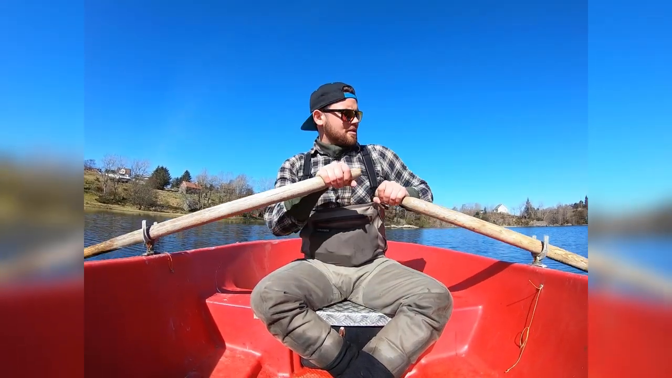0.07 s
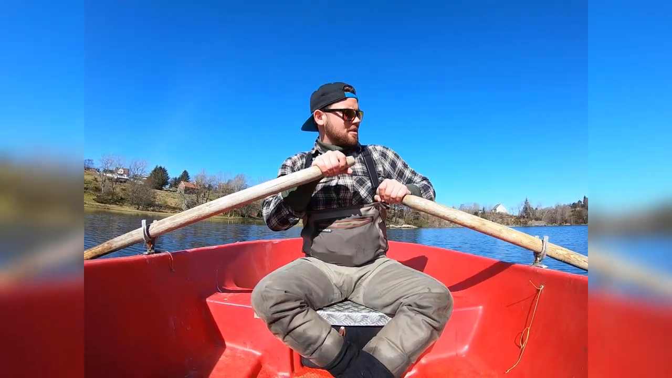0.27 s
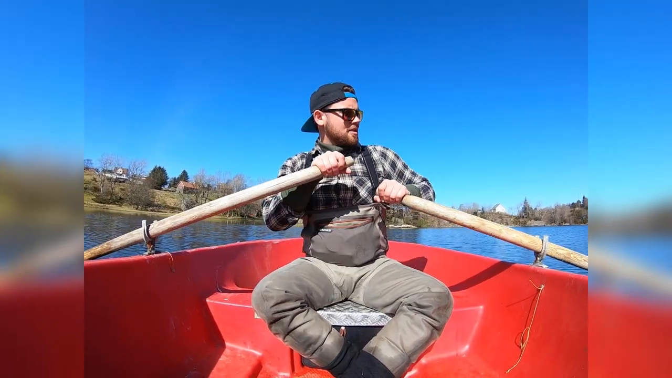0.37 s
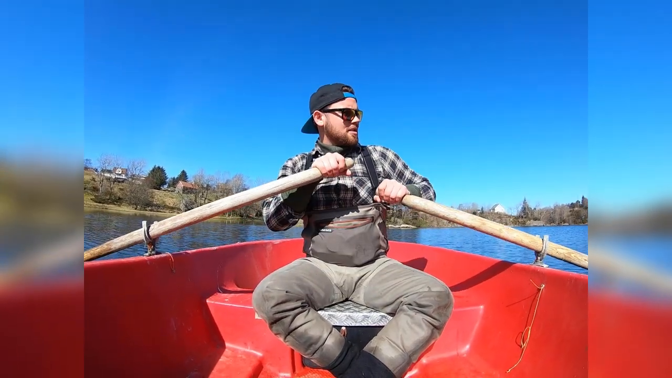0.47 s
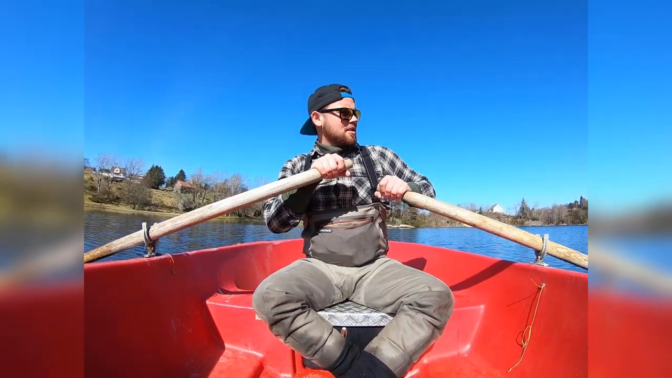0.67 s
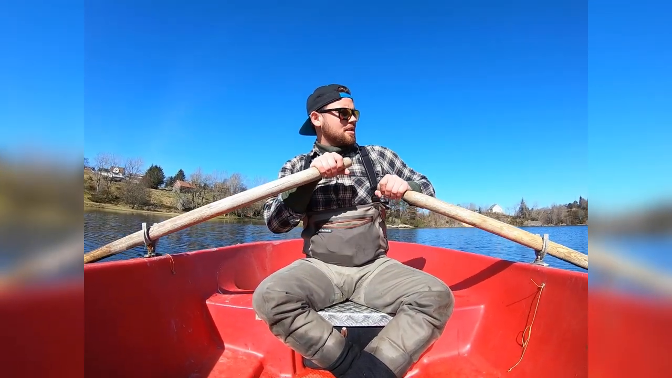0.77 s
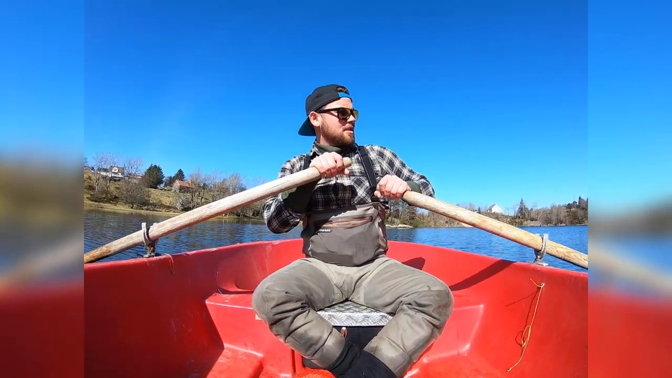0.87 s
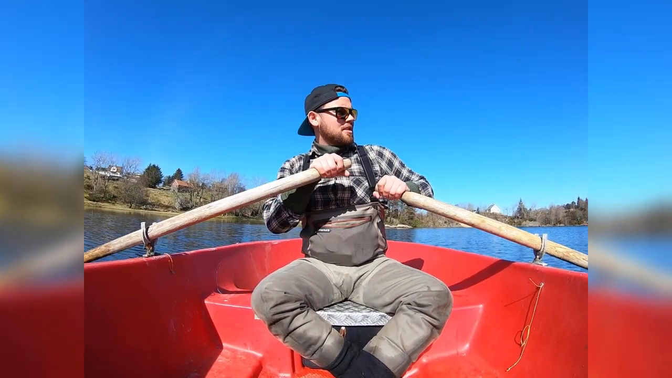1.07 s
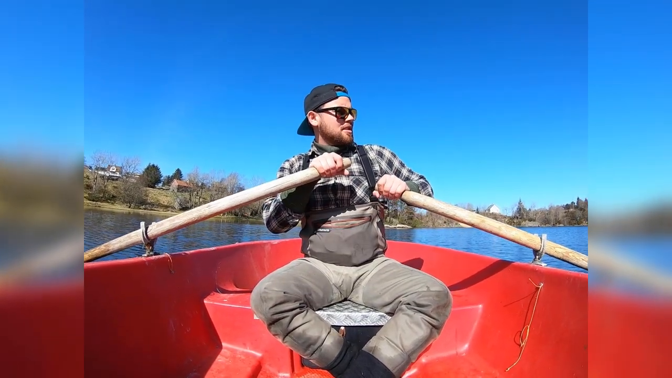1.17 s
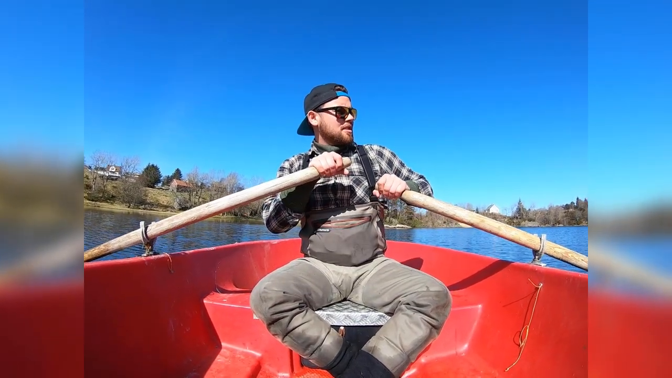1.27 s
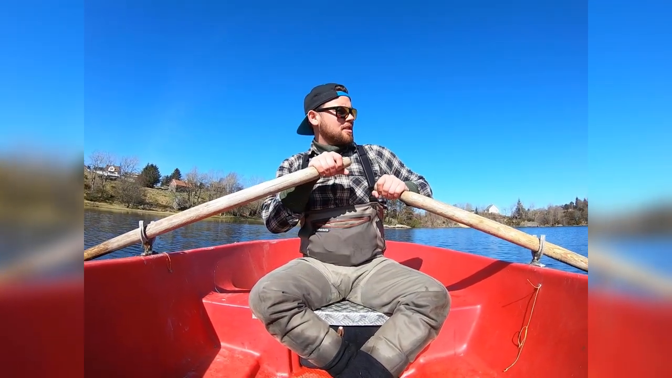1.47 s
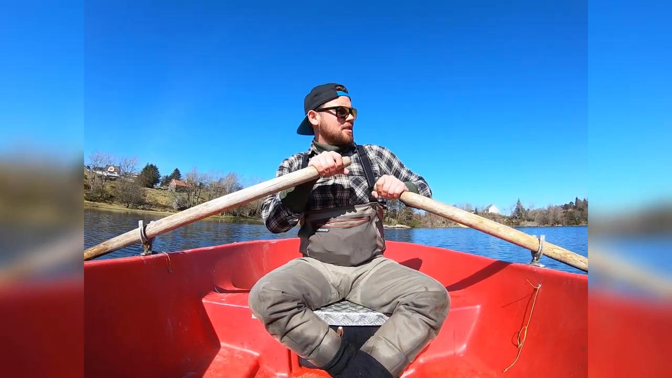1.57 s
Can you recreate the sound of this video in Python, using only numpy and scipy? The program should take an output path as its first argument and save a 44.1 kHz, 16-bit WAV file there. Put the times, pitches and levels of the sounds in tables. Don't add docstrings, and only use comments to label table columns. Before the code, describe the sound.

Rowing splash heard on board a small plastic boat on open water. Light spray and faint knocks open it; at 0.2-0.4 seconds low, hollow oarlock thuds cluster with the strongest churning splash and bright bubbling plops. Another surge follows near 0.5, a clear plop at 0.73, then ticking droplets, and softer swirls, gurgles and drips thin out until about 1.6 seconds. Light breeze rumbles low, uneven between left and right.

```python
import sys
import numpy as np
from scipy import signal
from scipy.fft import rfft, irfft, next_fast_len
from scipy.io import wavfile
from scipy.ndimage import map_coordinates

SR = 44100
rng = np.random.default_rng(int(sys.argv[2]) if len(sys.argv) > 2 else 0)


def field_ratio(decibels):
    return 10 ** (np.asarray(decibels, dtype=float) / 20)


def master_out(mix):
    frames = np.transpose(np.atleast_2d(mix))
    ceiling = np.clip(frames, -1, 1)
    pcm = np.round(ceiling * 32767).astype(np.int16)
    wavfile.write(sys.argv[1], SR, pcm)


N = 72765
TIME_S = np.arange(N) / SR


def unit(x):
    return x / np.sqrt(np.mean(x ** 2) + 1e-20)


def along(points, hz):
    f, v = np.transpose(points)
    return np.interp(np.log(hz + 1), np.log(f + 1), v)


def wobble(knots_per_s):
    return map_coordinates(rng.standard_normal(2000), [np.arange(N) * min(knots_per_s, 1000) / SR])


def filtered(x, response):
    m = next_fast_len(N + 8192)
    return irfft(rfft(x, m) * response(np.fft.rfftfreq(m, 1 / SR)), m)[..., :N]


def coloured(x, spectrum):
    return unit(filtered(x, lambda hz: field_ratio(along(spectrum, hz)) * (hz > spectrum[0][0] / 2)))


def bubbles(s, db, hz, cycles, rise, pan_db, size):
    spread_s_per_db = 0.00002
    cycles, rise = np.reshape(cycles, (-1, 1)), np.reshape(rise, (-1, 1))
    life = np.arange(size) / SR * hz[:, None] / cycles
    onset = 1 - np.exp(-(life * cycles / 1.355) ** 2)
    tone = np.sin(2 * np.pi * cycles * life * (1 + rise * life / 2))
    wave = field_ratio(db[:, None] - 26.0 * life) * onset * tone
    ports = []
    for side in (1, -1):
        start_s = np.clip(s - side * pan_db * spread_s_per_db / 2, 0, N / SR)
        at = np.round(start_s * SR).astype(int)[:, None] + np.arange(size)
        panned = wave * field_ratio(side * pan_db / 2)[:, None]
        ports.append(np.bincount(at.ravel(), panned.ravel(), N + size + 1)[:N])
    return np.array(ports)


def swarm(count, centre_hz, octaves, cycles, spread_db, pan_db, size):
    r, g = rng.random((count, 2)), rng.standard_normal((count, 2))
    hz = np.clip(centre_hz * 2 ** (octaves * g[:, 0]), 250, 14000)
    db = np.minimum(-spread_db * np.log(r[:, 1]), 2.6 * spread_db)
    db = db - 5 * octaves * np.abs(g[:, 0])
    return unit(bubbles(r[:, 0] * N / SR, db, hz, cycles, 0.15 * g[:, 1], pan_db + 9 * g[::-1, 1], size))


# frequency in Hz, density in dB per Hz.
RUMBLE_SPECTRUM = [(15, 15.5), (35, 7.5), (70, 11), (110, -3.5), (200, -12.5), (400, -86), (1500, -120)]
# centre in seconds, level in dB, half width in seconds.
BREEZE_PUFFS = [(.07, -53, 0.034), (0.138, -44, 0.059), (0.229, -34.5, 0.028), (0.357, -46, 0.04),
                (0.429, -49, 0.029), (.50, -69, 0.036), (0.69, -44, 0.026), (.78, -45.5, 0.019),
                (0.847, -43, 0.03), (0.937, -45, 0.027), (0.986, -48.5, 0.021), (1.128, -52.5, 0.038),
                (1.181, -43.5, 0.023), (1.221, -50, 0.019), (1.32, -54, 0.0085), (1.37, -70, 0.018),
                (1.509, -53, 0.028), (1.611, -75, 0.023)]


def breeze():
    lull_db = -63
    s, db, half_width_s = np.transpose(BREEZE_PUFFS)[:, :, None]
    gain = field_ratio(lull_db) + (field_ratio(db) * np.exp(-((TIME_S - s) / half_width_s) ** 2)).sum(0)
    common, *own = coloured(rng.standard_normal((3, N)), RUMBLE_SPECTRUM)
    return gain * (0.56 * common + 1.47 * np.array(own))


# start in seconds, churn level in dB, spray level in dB,
# hold in seconds, release in dB per second.
BLADE_SURGES = [(0.0, -87, -64, 0.011, 30), (0.023, -72, -54, 0.053, 504), (0.177, -49, -47, 0.038, 195),
                (0.236, -43, -52, 0.039, 188), (0.276, -54, -50, 0.016, 143),
                (0.322, -47.5, -52, 0.082, 109), (0.381, -73, -52, 0.091, 252),
                (0.455, -59, -52, 0.036, 196), (0.487, -48.5, -61.5, 0.097, 243),
                (0.636, -48.5, -57.5, 0.036, 139), (0.684, -48, -62.5, 0.18, 76),
                (0.97, -50.5, -65, 0.032, 161), (1.055, -52, -64.5, 0.043, 95),
                (1.16, -55, -63, 0.046, 112), (1.27, -54.5, -66.5, 0.088, 89), (1.398, -58, -68, 0.13, 190),
                (1.566, -57.5, -65.5, 0.049, 112)]


def surges():
    attack_s, churn_calm_db, spray_calm_db = 0.0064, -67, -83
    s, churn_db, spray_db, hold_s, release_db_per_s = np.transpose(BLADE_SURGES)[:, :, None]
    t = TIME_S - s
    rise = np.clip(1 + t / attack_s, 0, 1) ** 2
    power = rise * field_ratio(-release_db_per_s * np.clip(t - hold_s, 0, None)) ** 2

    def total_db(db, calm_db):
        return 10 * np.log10((power * field_ratio(db) ** 2).sum(0) + field_ratio(calm_db) ** 2)

    return total_db(churn_db, churn_calm_db), total_db(spray_db, spray_calm_db)


# frequency in Hz, density in dB per Hz.
CHURN_SPECTRUM = [(200, 6.5), (300, -16), (600, 5), (1500, -5), (2500, -3), (4000, -41), (7000, -48),
                  (11000, -86)]
# frequency in Hz, left-right correlation (0 to 1).
PORT_LIKENESS = [(250, 0.09), (640, 0.49), (1400, 0.04), (4000, 0.14)]


def churn():
    level_db, _ = surges()

    def mid_side(hz):
        angle = np.arccos(np.clip(along(PORT_LIKENESS, hz), -1, 1)) / 2
        return [np.cos(angle), np.sin(angle)]

    mid, side = filtered(rng.standard_normal((2, N)), mid_side)
    bed = coloured(np.array([mid + side, mid - side]), CHURN_SPECTRUM)
    bed = bed * field_ratio(2.3 * np.array([wobble(29.14), wobble(30.7)])) * field_ratio([[-1.2], [1.2]])
    foam = swarm(count=1500, centre_hz=1650, octaves=0.55, cycles=11, spread_db=2.5, pan_db=-3.5, size=900)
    gulps = swarm(count=600, centre_hz=500, octaves=0.67, cycles=5.3, spread_db=1.0, pan_db=1.0, size=2400)
    fizz = swarm(count=500, centre_hz=3400, octaves=0.31, cycles=20, spread_db=3, pan_db=-2.5, size=400)
    mix = field_ratio(-4) * bed + field_ratio(-0.53) * foam + field_ratio(-8.0) * gulps + field_ratio(-21) * fizz
    return field_ratio(level_db + 1.3 * wobble(25.15)) * mix


# frequency in Hz, density in dB per Hz.
SPRAY_SPECTRUM = [(2500, -3), (3500, 0.5), (5500, -7), (8000, -7), (11400, -27.5), (13500, -33),
                  (15300, -56), (16000, -100)]
# start in seconds, peak in dB, pitch in Hz.
DROPLET_TICKS = [(0.067, -45, 5640), (0.16, -49, 6800), (0.186, -49, 5940), (0.2033, -42, 5030),
                 (0.362, -37, 6200), (0.428, -35, 7700), (0.5586, -60, 5900), (0.5921, -52, 7860),
                 (0.631, -51.5, 7200), (0.656, -56, 9500), (0.6659, -48, 5360), (0.681, -55, 8000),
                 (0.7055, -44, 7800), (0.72, -62, 8100), (0.731, -45.5, 5700), (0.776, -42.5, 7050),
                 (0.7986, -59, 7060), (0.816, -44, 7000), (0.831, -43.5, 6500), (0.8701, -45.5, 7450),
                 (0.9085, -51.5, 6900), (0.9658, -57, 6300), (0.9924, -44, 6760), (1.003, -50, 6400),
                 (1.034, -58.5, 9000), (1.064, -60, 5000), (1.08, -66, 8000), (1.1616, -63, 6100),
                 (1.198, -51, 4800), (1.438, -52.5, 7040), (1.4509, -50.5, 5900), (1.507, -59, 7000)]


def spray():
    port_lag_s, tick_pan_db, tick_top_hz = 0.000075, -6.5, 10400
    _, level_db = surges()
    gain = field_ratio(level_db)

    def lag(hz):
        return np.exp(1j * np.pi * hz * port_lag_s * np.array([[1], [-1]]))

    r = rng.random((2, N))
    sparks_db = np.minimum(-4 * np.log(r[1] + 1e-9), 11)
    crackle = unit((r[0] < 0.005) * rng.standard_normal(N) * field_ratio(sparks_db))
    near = 0.6 * crackle + rng.standard_normal(N) * field_ratio(3.5 * wobble(45))
    near = coloured(near, SPRAY_SPECTRUM) * field_ratio([[-2.6], [2.6]])
    patches = field_ratio(6.1 * np.array([wobble(110), wobble(80)]))
    wide = coloured(rng.standard_normal((2, N)) * patches, SPRAY_SPECTRUM)
    hiss = filtered(gain * near, lag) + gain * field_ratio(-3.5) * wide

    treble_hz, treble_full_db, treble_db_per_db = 10800, -56, 1.3
    treble = filtered(hiss, lambda hz: 1 / (1 + (treble_hz / (hz + 1)) ** 16))
    treble_gain = field_ratio(treble_db_per_db * np.minimum(level_db - treble_full_db, 0))

    s, db, hz = np.transpose(DROPLET_TICKS)
    ticks = bubbles(s, db + 13.5, hz, cycles=7, rise=0.055, pan_db=tick_pan_db + 0 * s, size=200)
    ticks = filtered(ticks, lambda hz: 1 / (1 + (hz / tick_top_hz) ** 8))
    return hiss - treble * (1 - treble_gain) + filtered(ticks, lag)


# start in seconds, peak in dB, pitch in Hz, left-right difference in dB.
WATER_PLOPS = [(0.0492, -38.5, 2150, -9), (0.0745, -36, 1980, -20), (0.107, -42.5, 2260, -5),
               (0.1707, -34, 1557, -27.5), (0.2353, -37.5, 1660, -15), (0.2528, -32, 1530, 7),
               (0.255, -22, 2440, 3.5), (0.2605, -33.5, 1960, 7), (0.3278, -30, 1830, 8),
               (0.3697, -32, 1700, -5), (0.4081, -28, 1636, -12), (0.4429, -31.5, 1390, -10),
               (0.474, -41, 1640, -12), (0.4962, -35.5, 1274, -19.5), (0.5447, -32.5, 1720, -3),
               (0.5916, -40, 1170, 13), (0.637, -34.5, 1880, 23), (0.6545, -31, 1700, -6.5),
               (0.7245, -35, 842, -6), (0.7281, -23.5, 1257, -10), (0.7706, -36, 1320, -12),
               (0.8309, -49.5, 1010, -15), (0.905, -34, 1850, -9.5), (0.9667, -43, 1690, -13),
               (0.998, -33.5, 1680, -9), (1.014, -39.5, 2000, -16), (1.046, -56, 3270, 1),
               (1.075, -45, 3800, -10), (1.051, -41.5, 1230, -13), (1.073, -42.5, 2650, -10.5),
               (1.1023, -39.5, 2090, 4), (1.1514, -42.5, 1310, -18), (1.152, -41, 2900, -6),
               (1.18, -41, 843, 6), (1.2106, -55, 1370, 18), (1.254, -45, 3020, -2), (1.276, -42, 2800, -3),
               (1.3044, -34.5, 2010, -13.5), (1.328, -39, 1640, -10), (1.3663, -45, 1970, 21),
               (1.4066, -44, 2040, -1), (1.418, -42, 1370, 5), (1.4308, -39.5, 1460, -20.5),
               (1.5632, -40.5, 1475, 11), (1.567, -47, 3470, 4), (1.6091, -44.5, 1530, 9)]
# start in seconds, peak in dB, pitch in Hz,
# life in cycles, pitch rise over life (fraction).
WATER_GURGLES = [(.329, -29.5, 2760, 18, 0.091), (0.338, -29, 1514, 16.4, 0.068), (.54, -47, 604, 40, 0.18),
                 (.635, -45.5, 394, 12.4, -0.21), (.71, -30, 630, 7.8, 0.21), (.74, -44.5, 190, 20, -0.089),
                 (.865, -45, 398.6, 26, 0.34), (.655, -44.5, 245, 15.6, -0.19),
                 (.16, -43.5, 1690, 12, -0.36), (0.186, -33.5, 2190, 19, 0.068),
                 (.995, -42.5, 585, 70.4, -.09), (1.059, -35.5, 513, 6.6, 0.11),
                 (1.125, -49, 634, 12, -0.1), (1.244, -49, 663, 28, 0.023), (1.31, -57, 614, 31, 0.014),
                 (1.337, -49, 680, 23, 0.23), (1.37, -54.5, 577, 38, 0.065), (1.438, -54.5, 456, 20, 0.084),
                 (1.609, -47, 415, 5.8, -0.14), (1.46, -48, 785, 24, -0.036), (1.475, -49.5, 877, 82, 0.54),
                 (1.59, -53, 843, 21, -0.16), (0.328, -29, 75.5, 13, 0.1), (1.535, -70, 3330, 340, 0.44),
                 (1.59, -44, 500, 5.9, -0.067)]


def drips():
    plop_cycles, trail_count, trail_s, trail_octaves, trail_db = 9.5, 5, 0.014, 0.22, -9
    s, db, hz, pan_db = np.transpose(WATER_PLOPS)
    db = db + 3.5
    plops = bubbles(s, db, hz, plop_cycles, 0.083, pan_db, size=1200)

    r, g = rng.random((len(s), trail_count)), rng.standard_normal((len(s), trail_count))
    late_s = (s[:, None] + trail_s * r).ravel()
    late_db = (db[:, None] + trail_db - 6 * r).ravel()
    late_hz = (hz[:, None] * 2 ** (trail_octaves * g)).ravel()
    late_pan_db = np.repeat(pan_db / 2, trail_count)
    trail = bubbles(late_s, late_db, late_hz, plop_cycles, 0.3, late_pan_db, size=1200)

    s, db, hz, cycles, rise = np.transpose(WATER_GURGLES)
    flutter = field_ratio(3 * np.array([wobble(70), wobble(68.6)]))
    gurgles = bubbles(s, db + 2.0, hz, cycles, rise, pan_db=-4 + 0 * s, size=6000)
    return plops + trail + flutter * gurgles


# time in seconds, rub level in dB.
OAR_LOAD = [
    (0.0, -40),
    (0.196, -47.5),
    (1.65, -70),
]
# time in seconds, level in dB.
OARLOCK_KNOCKS = [(0.051, -36), (0.085, -34.5), (.199, -19.5), (0.213, -33.5), (0.2272, -19.5),
                  (0.2376, -13.5), (0.2475, -16), (0.284, -21.5), (0.292, -30), (0.333, -31.5),
                  (0.361, -27.5), (0.401, -31.5), (0.656, -46), (.715, -39.5), (0.74, -47)]
# frequency in Hz, level in dB, 60 dB decay in seconds.
HULL_MODES = [(79.2, -12, 0.19), (134, -3, 0.14), (193.3, 2, 0.089), (241, -20, 0.032), (355, -14.5, 0.05)]


def hull():
    t = np.arange(SR // 2) / SR
    ring = sum(field_ratio(db - 60 * t / t60_s) * np.sin(2 * np.pi * hz * t) for hz, db, t60_s in HULL_MODES)
    ring = ring * (1 - np.exp(-t / 0.0082))
    blows = np.zeros(N)
    for s, db in OARLOCK_KNOCKS:
        blows[round(s * SR)] = field_ratio(db)
    knocks = signal.fftconvolve(blows, ring)[:N]
    load_db = np.interp(TIME_S, *np.transpose(OAR_LOAD))
    judder = unit(signal.fftconvolve(rng.standard_normal(N), ring)[:N])
    return (knocks + field_ratio(load_db - 15) * judder) * field_ratio([[-0.9], [0.9]])


def scene():
    water = churn() + spray() + drips()
    echoes = np.zeros((2, 600))
    echoes[[[0], [1]], rng.integers(60, 600, (2, 6))] = field_ratio(-21) * rng.standard_normal((2, 6))
    reflected = signal.fftconvolve(water[::-1], echoes, axes=1)[:, :N]
    return water + reflected + hull() + breeze()


def roll_off(x):
    return signal.sosfilt(signal.butter(12, 15500, fs=SR, output="sos"), x)


def record(dry):
    return roll_off(dry)


dry = scene()
out = record(dry)
master_out(out)
```